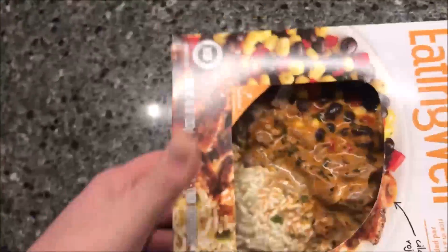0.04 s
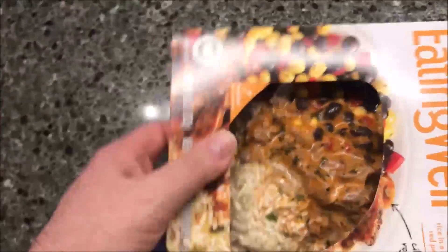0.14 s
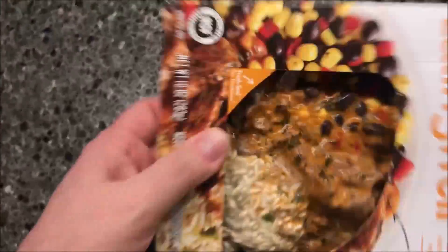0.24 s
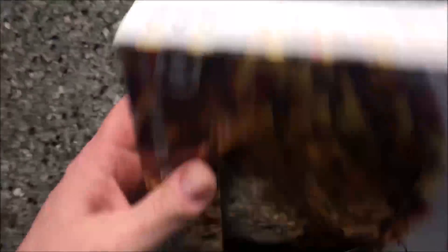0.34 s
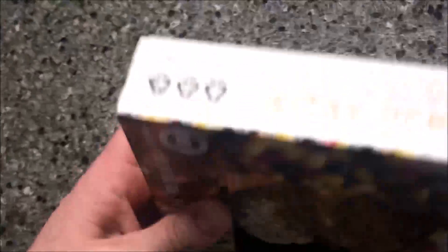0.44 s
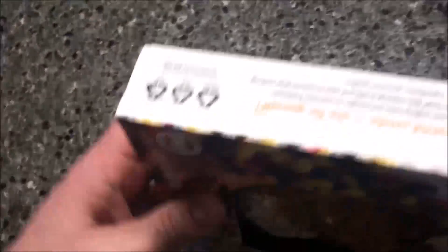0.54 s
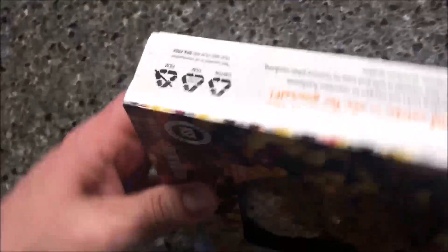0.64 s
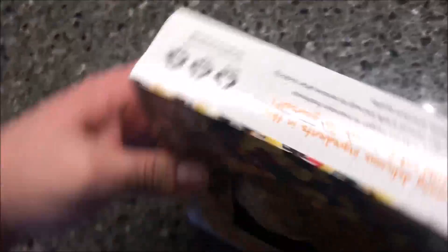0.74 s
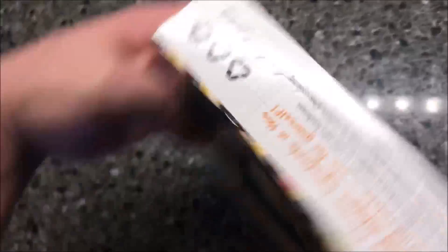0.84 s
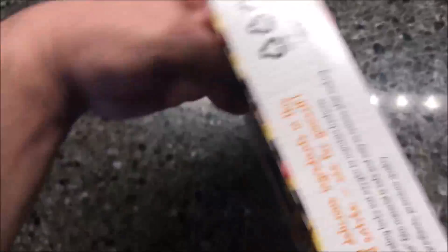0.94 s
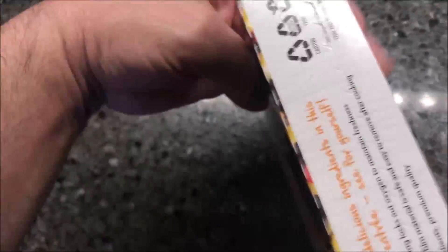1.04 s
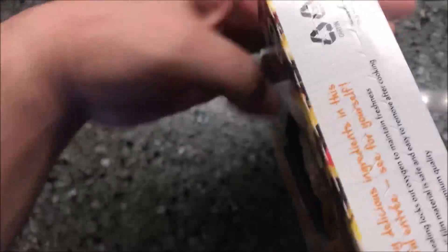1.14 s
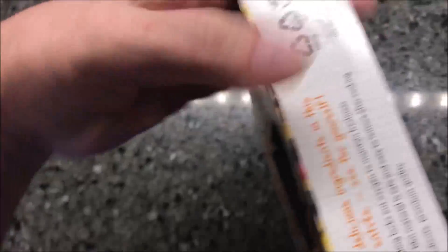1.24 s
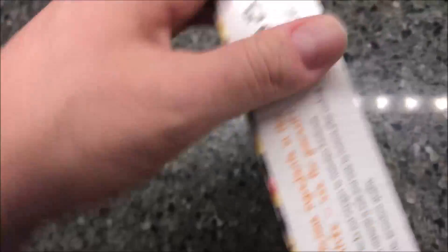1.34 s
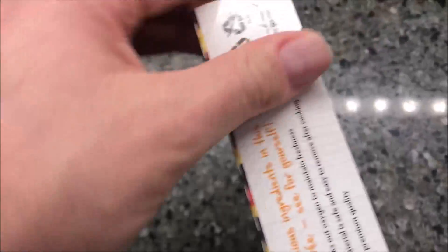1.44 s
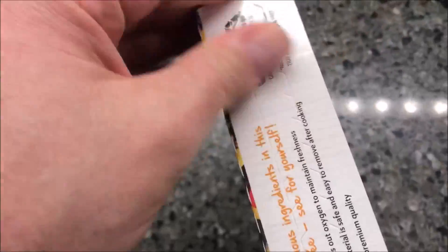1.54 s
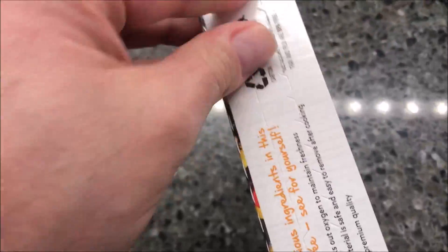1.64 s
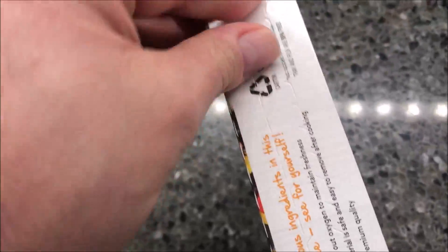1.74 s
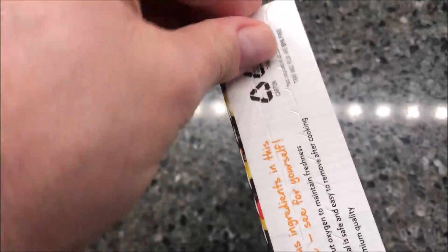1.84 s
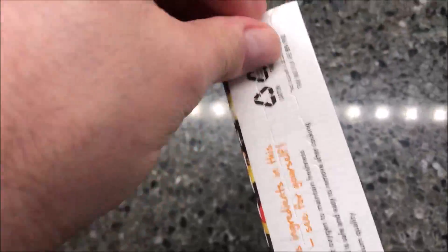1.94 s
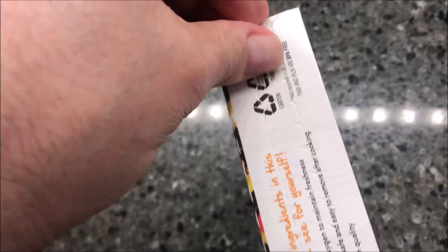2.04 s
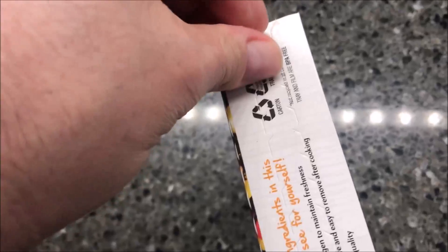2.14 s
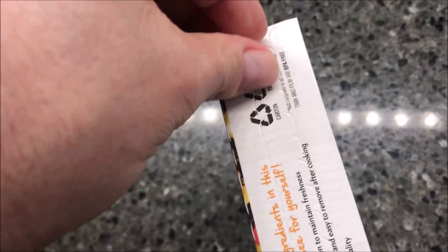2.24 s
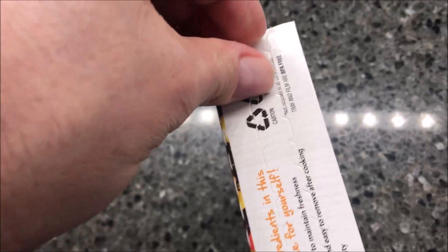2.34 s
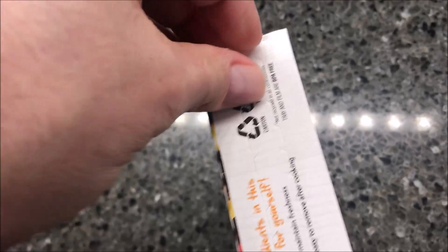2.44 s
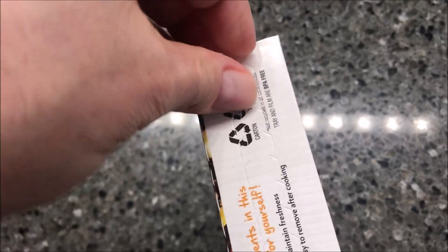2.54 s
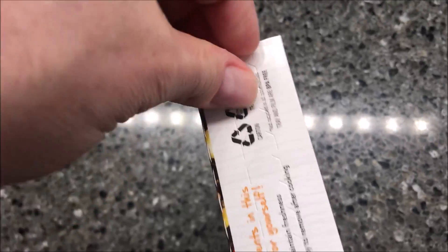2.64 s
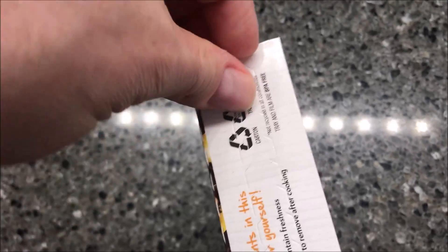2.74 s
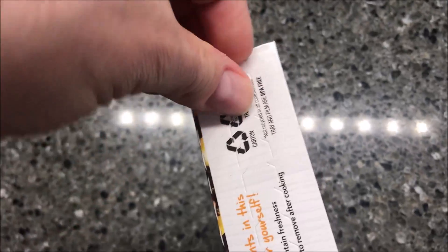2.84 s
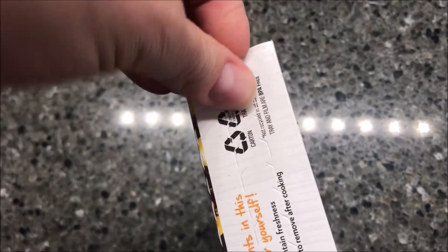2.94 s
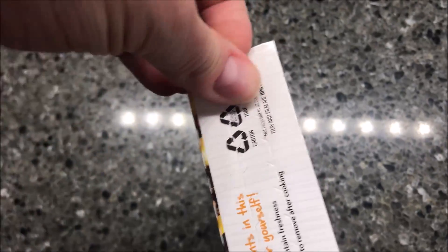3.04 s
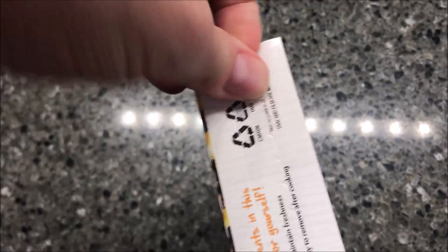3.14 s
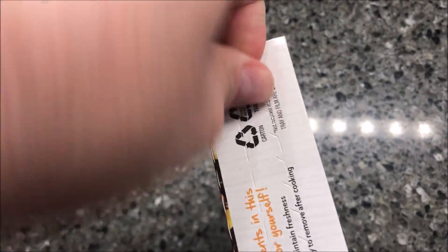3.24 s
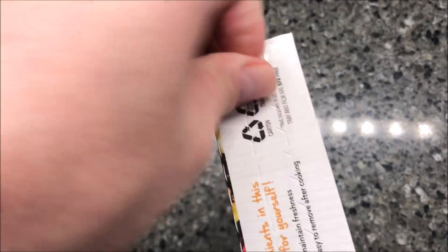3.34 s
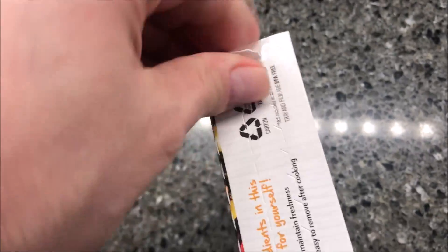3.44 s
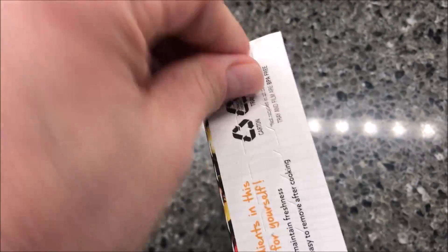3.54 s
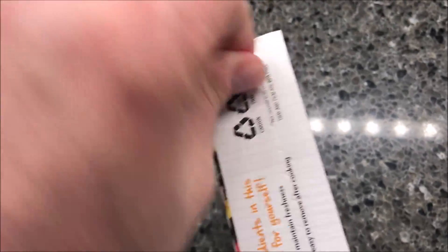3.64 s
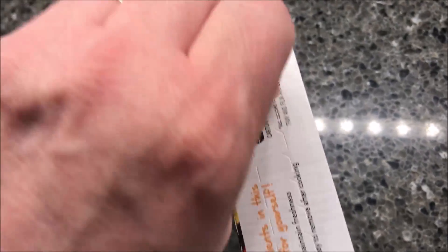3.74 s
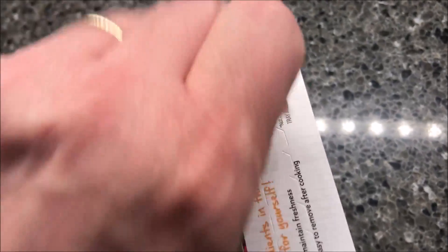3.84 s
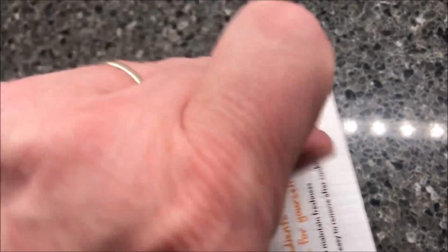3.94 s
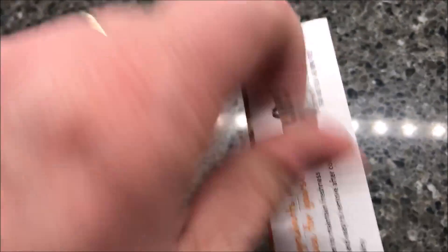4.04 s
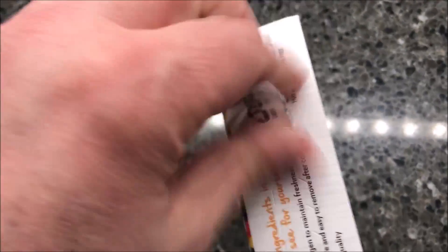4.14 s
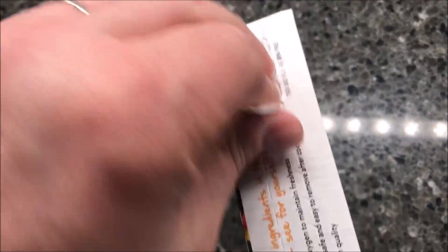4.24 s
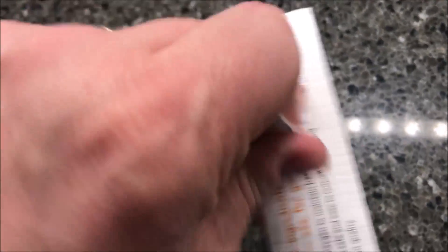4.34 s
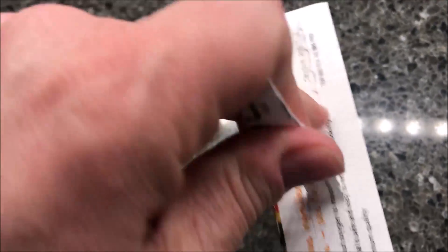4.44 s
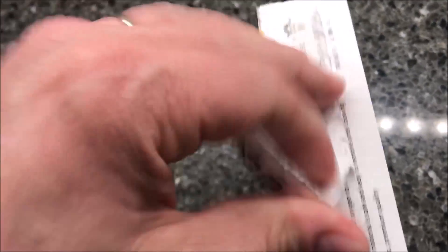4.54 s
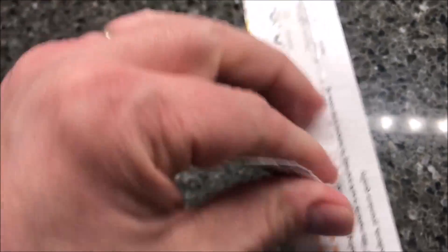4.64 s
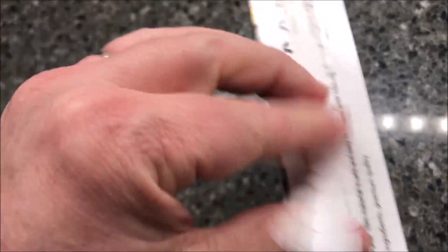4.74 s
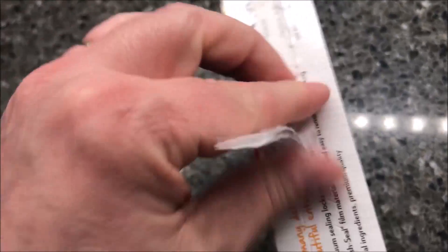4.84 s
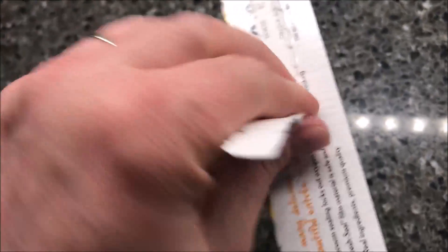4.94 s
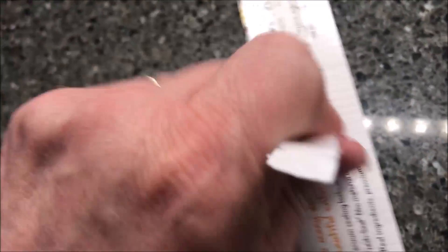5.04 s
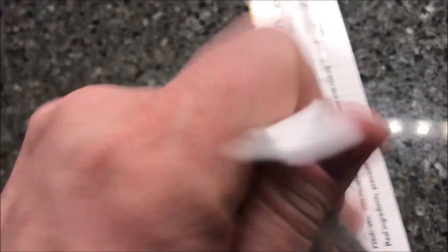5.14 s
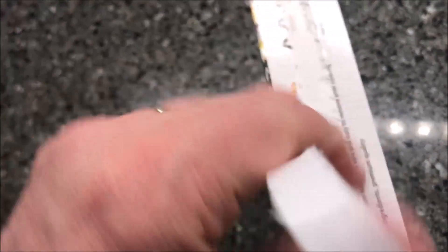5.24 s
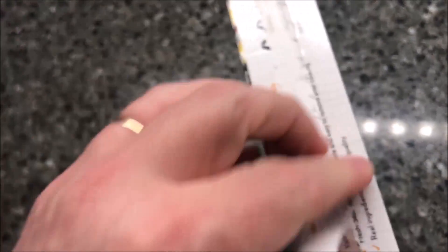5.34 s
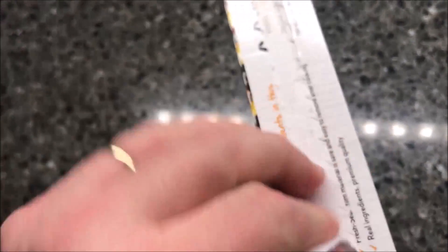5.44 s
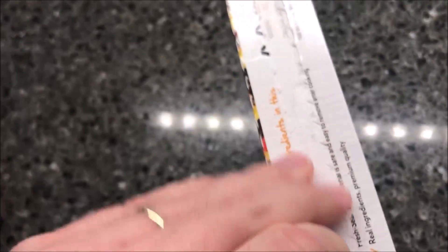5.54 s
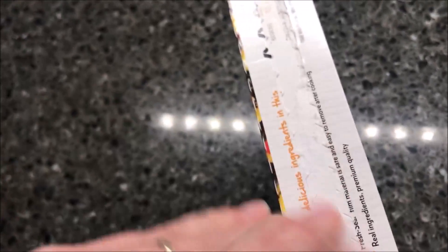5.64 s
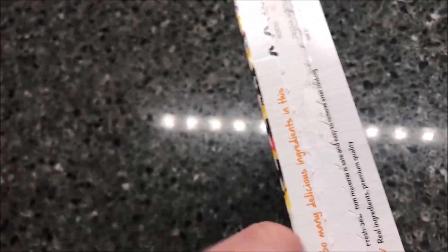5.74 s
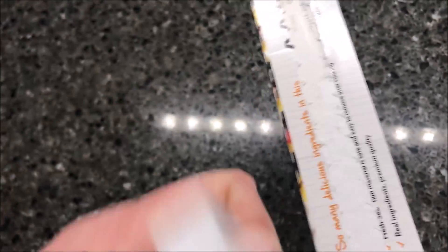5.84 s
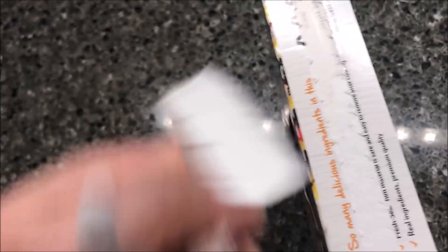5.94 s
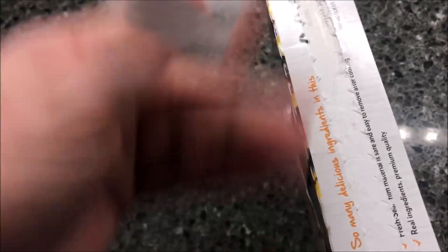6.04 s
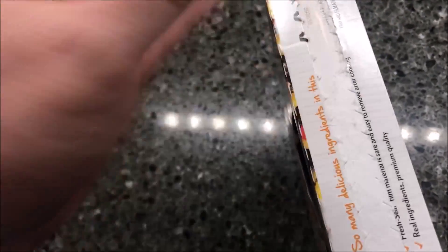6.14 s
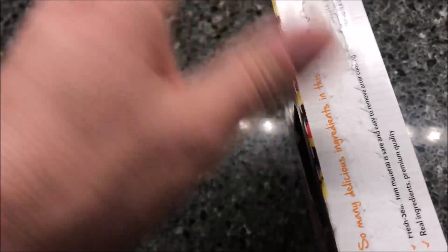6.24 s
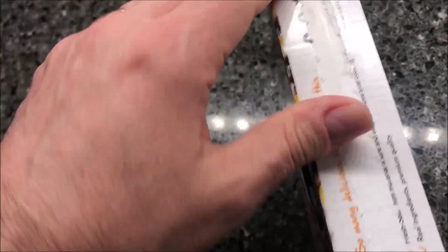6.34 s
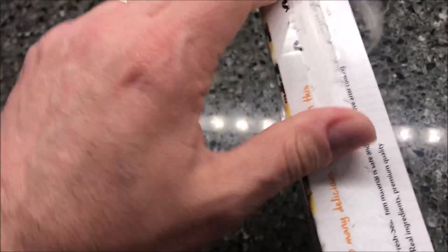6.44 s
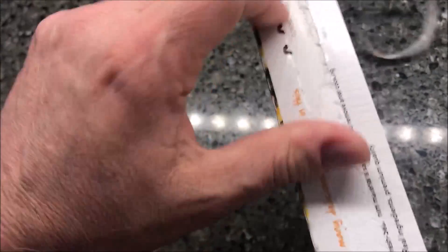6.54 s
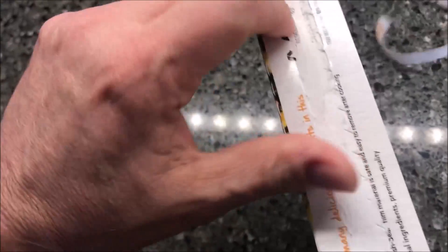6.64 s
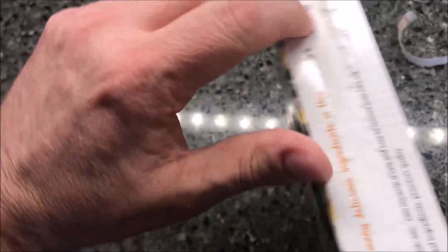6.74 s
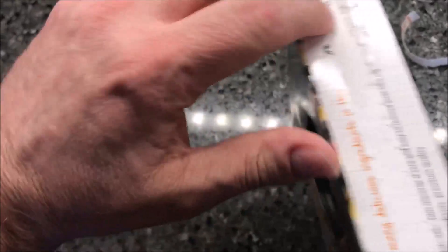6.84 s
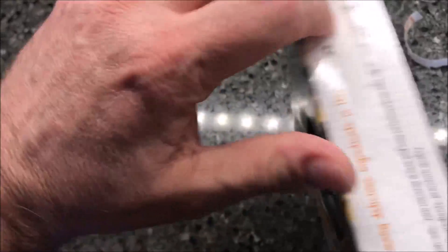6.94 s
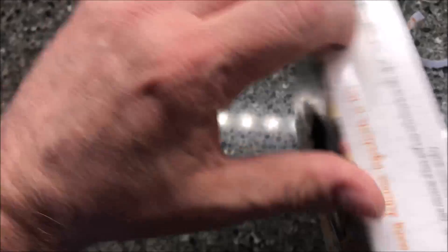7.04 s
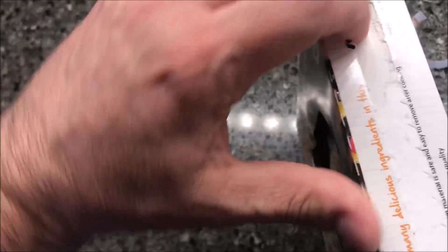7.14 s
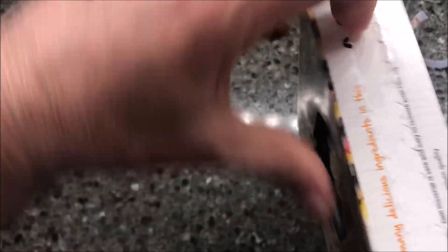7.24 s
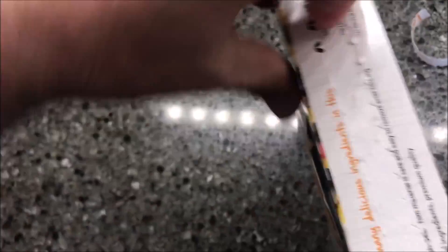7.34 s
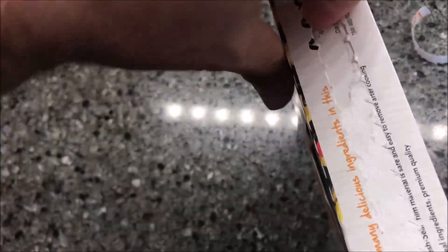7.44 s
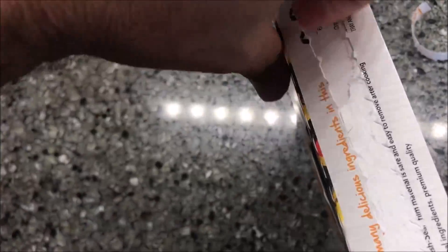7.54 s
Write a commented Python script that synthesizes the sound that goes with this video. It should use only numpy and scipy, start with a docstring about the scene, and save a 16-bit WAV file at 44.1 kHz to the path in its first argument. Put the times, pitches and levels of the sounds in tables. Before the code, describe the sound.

Hands fumble a hollow paperboard box with a low thump, clicks and dry scuffs. It rests, almost quiet, before tiny picking ticks lead to sharp popping snaps and crunchy tearing in three clusters, brighter and thinner as the box gapes. Then only small handling taps and faint brushing. Close microphone, short hard kitchen reflections, steady appliance hum.

```python
"""Tearing open a carton

A paperboard food carton is handled, set down on a stone kitchen counter, picked at and torn open along its strip.
Taps, perforation ties and tugs are bursts of random fibre snaps; sliding is a stream of tiny slips, and judders
are low stick-slip pulses. All but the judders and the low sway ring through the hollow box, whose colour changes
as it is set down and gapes open. A small hard room rings behind, over steady air and a low appliance hum.
"""
import sys
import numpy as np
from scipy import signal
from scipy.fft import rfft, irfft
from scipy.io import wavfile
from scipy.ndimage import uniform_filter1d

SR = 44100
rng = np.random.default_rng(int(sys.argv[2]) if len(sys.argv) > 2 else 0)


def master(y):
    """Save y as 16-bit WAV."""
    cut = np.clip(np.atleast_2d(y).T, -1, 1)
    pcm = np.round(cut * 32767)  # scale
    wavfile.write(sys.argv[1], SR, pcm.astype(np.int16))


N = 335098
TIME = np.arange(N) / SR
# the box is set down, and later gapes open
SET_DOWN_S, OPEN_S = 1.38, 4.8


def amp(db):
    """Decibels to gain."""
    return 10 ** (np.asarray(db) / 20)


def unit(x):
    """Scales to an energy of one."""
    return x / np.sqrt(np.sum(x ** 2) + 1e-20)


def read(points, hz):
    """Reads a table on a log-frequency axis."""
    f, value = np.transpose(points)
    return np.interp(np.log(hz + 1), np.log(f + 1), value)


def add(mix, s, sound):
    """Mixes a sound in from time s on."""
    start = round(s * SR)
    sound = sound[max(-start, 0):]
    part = mix[max(start, 0):][:len(sound)]
    part += sound[:len(part)]


def ring(x, response):
    """Passes x through an impulse response."""
    return signal.oaconvolve(x, response)[:len(x)]


def treble(db, bright_db):
    """Shares a treble level between rasp and fizz; brightness is fizz over rasp."""
    rasp = amp(db) / np.sqrt(1 + amp(bright_db) ** 2)
    return rasp, rasp * amp(bright_db)


def fibres(size, per_s, spread_db):
    """Random tiny snaps, mostly small and a few large, with a mean power of one."""
    heights = amp(spread_db * np.minimum(rng.exponential(1, size), 3.5))
    signs = rng.choice([-1, 1], size)
    happens = rng.random(size) < per_s / SR
    return unit(heights * signs * happens) * np.sqrt(size)


# tone colour of the box held up, standing shut and gaping, as the microphone hears it, with its notch
# near 10.4 kHz; relative within each range: [f/Hz, level/dB]
HELD_COLOUR = [(45, -7.5), (90, -0.5), (250, 0.5), (400, -2.5), (600, -5), (850, -5), (1200, -1.5),
               (2100, -6), (3200, -8.5), (6500, -14), (9300, -18.5), (10400, -22.5), (11500, -22),
               (16000, -23.5)]
STANDING_COLOUR = [(45, -2), (120, -1), (250, -4), (380, -1.5), (600, -7), (830, -8), (1150, 1), (1500, -4),
                   (2400, -9.5), (4000, -8.5), (9300, -12), (10400, -16), (11500, -12.5), (16000, -17)]
TORN_COLOUR = [(45, -20), (90, -18.5), (250, -14), (450, -8.5), (650, -3.5), (830, -7.5), (1100, -0.5),
               (1500, -4.5), (2300, -12), (4500, -7), (9300, -8.5), (10400, -13.5), (11500, -9.5),
               (16000, -12.5)]
# resonances of the panels and the enclosed air, lift before hollow scales it: [f/Hz, width/Hz, lift level/dB]
BOX_RESONANCES = [(381, 63, 4.5), (512, 26.6, 0), (629.4, 187, 3), (1042.9, 100, 13), (1109.5, 70, 4.5),
                  (1210.3, 118, 8.5), (1695.6, 60, 5.5), (2204, 84, 5.5), (3917, 330, 7.5), (4486, 146, 7),
                  (5310, 150, 4.5), (5850, 410, 3.5), (12700, 800, 3.5)]
# edges of the thud, panel, rasp and fizz ranges: [f/Hz]
RANGE_EDGES = [40, 450, 2500, 7500, 17000]


def carton(colour, hollow, size=8192):
    """Minimum-phase responses of the box in its four ranges; hollow scales the resonances."""
    hz = np.fft.rfftfreq(size, 1 / SR) + 1
    lift = sum((amp(hollow * db) - 1) / (1 + (2 * (hz - f) / width) ** 2) for f, width, db in BOX_RESONANCES)
    gain = amp(read(colour, hz)) * abs(1 + lift)
    responses = []
    for lo, hi in zip(RANGE_EDGES, RANGE_EDGES[1:]):
        band = gain / np.sqrt((1 + (lo / hz) ** 10) * (1 + (hz / hi) ** 10))
        log_gain = np.log(np.maximum(band / band.max(), 1e-4))
        circle = np.concatenate([log_gain, log_gain[-2:0:-1]])
        # the Hilbert transform of the log gain supplies the phase
        spectrum = np.exp(np.conj(signal.hilbert(circle)))
        responses.append(unit(np.fft.ifft(spectrum).real[:size // 4]))
    return responses


def spot(box, die_s, flex, size=1024):
    """Bending waves bounce around the board, differently from every spot; flex is their share in the lows."""
    t = np.arange(size) / SR
    paths = rng.standard_normal(size)
    low = flex * unit(paths * np.exp(-t / (2.73 * die_s)))  # long waves last longer
    high = 1.11 * unit(paths * np.exp(-t / die_s))
    bounces = low, low, high, high
    return [unit(signal.fftconvolve(h, (t == 0) + b)) for h, b in zip(box, bounces)]


def travel(drives, box, die_s, flex, size):
    """A moving source fades from one spot to the next, so its colour keeps shifting."""
    out = np.zeros(len(drives[0]))
    fade = signal.windows.cosine(size)
    hop = size // 2
    padded = np.pad(drives, ((0, 0), (hop, size)))
    for start in range(0, len(out) + hop, hop):
        pieces = padded[:, start:start + size] * fade * rng.choice([-1, 1], size)
        rung = signal.fftconvolve(pieces, np.array(spot(box, die_s, flex)), axes=1)
        add(out, (start - hop) / SR, rung.sum(0))
    return out


def blow(push, grit, box, thud_db, panel_db, crackle_db, bright_db):
    """A push moves the panels and its grit makes the treble; levels are rms over a hundredth of a second."""
    gains = amp(thud_db), amp(panel_db), *treble(crackle_db, bright_db)
    drives = push, push, grit, grit
    parts = [g * unit(ring(d, h)) for g, d, h in zip(gains, drives, box)]
    return np.sqrt(SR / 100) * sum(parts)


def sway(hz, rise_s, size=6144):
    """The whole box rocks at a rate scattered around hz, swells to a peak at rise_s and comes to rest."""
    t = np.arange(size) / SR
    rocking = np.sin(2 * np.pi * hz * rng.uniform(0.944, 1.208) * t)
    return rocking * t / rise_s * np.exp(1 - t / rise_s)


# spectrum of the room air, relative density per Hz: [f/Hz, level/dB]
AIR_SPECTRUM = [(20, -40.5), (35, -25), (55, -4), (85, -7), (150, -3.5), (220, -9), (350, -9.5), (600, -18),
                (1100, -25), (2500, -35.5), (6000, -41.5), (16000, -44.5)]
# appliance hum lines: [f/Hz, rms level/dB]
HUM_LINES = [(58, -63.5), (120, -66.5), (214, -68.5)]


def background(air_db=-55.5):
    """Steady room air as shaped noise, with a faint appliance hum of steady sines."""
    spectrum = rfft(rng.standard_normal(N)) * amp(read(AIR_SPECTRUM, np.fft.rfftfreq(N, 1 / SR)))
    air = unit(irfft(spectrum, N)) * np.sqrt(N)
    hum = sum(amp(db) * np.sqrt(2) * np.sin(2 * np.pi * (hz * TIME + rng.random())) for hz, db in HUM_LINES)
    return amp(air_db) * air + hum


# judders and squeaks under a gripping or pulling hand:
# [start t/s, end t/s, first slip f/Hz, last slip f/Hz, level/dB before the end fades]
JUDDER_EVENTS = [(0.0, 0.029, 140.9, 80.2, -29), (.045, 0.114, 110.2, 75, -43.5),
                 (.625, 0.729, 99.47, 59.8, -46.5), (1.099, 1.2, 125, 67.8, -37),
                 (1.115, 1.191, 526.4, 554.5, -40.5), (3.93, 4.05, 62, 48, -41.5),
                 (6.415, 6.481, 110.9, 85.1, -50)]


def judder(dull_hz=330, unsteady=0.0532):
    """Soft stick-slip pushes glide from a first to a last slip rate, with a slightly wandering pitch."""
    out = np.zeros(N)
    for start, end, first_hz, last_hz, db in JUDDER_EVENTS:
        hz = np.linspace(first_hz, last_hz, max(round((end - start) * SR), 20))
        wander = uniform_filter1d(rng.standard_normal(N), 200)[:len(hz)]
        turns = np.cumsum(hz * (1 + unsteady * wander / wander.std())) / SR
        # harmonics weaken above dull_hz
        pushes = sum(np.sin(2 * np.pi * k * turns) / (1 + (k * hz / dull_hz) ** 2) for k in range(1, 8))
        add(out, start, amp(db) * pushes / pushes.std() * signal.windows.tukey(len(hz), .5))
    return out


# strokes of skin or loose strip over the board, levels before the sliding trim:
# [fastest t/s, length t/s, panel level/dB, hiss level/dB, brightness level/dB]
STROKE_EVENTS = [(.01, 0.2046, -30, -40.5, -9), (0.247, 0.28, -45.5, -49, -6), (0.431, 0.344, -48, -50, -8),
                 (0.634, 0.207, -45.5, -50, -5), (0.824, 0.179, -45, -41, -2),
                 (0.961, 0.241, -43.5, -43, -2.5), (1.122, 0.156, -39.5, -41, -5.5),
                 (1.302, 0.232, -56.5, -50, 3.5), (1.46, 0.1274, -44, -38.5, 6.5),
                 (1.631, 0.1223, -44, -44.5, -0.5), (1.775, 0.229, -50.5, -55.5, -1.5),
                 (1.939, 0.398, -57.5, -64, -3.5), (3.122, 0.47, -65.5, -60.5, 3),
                 (3.331, 0.197, -44.5, -43, 0), (3.476, 0.0394, -43, -48, 5), (3.594, 0.12, -51, -55, 1),
                 (3.757, 0.0716, -45, -43, -4.5), (3.924, 0.451, -46.5, -44.5, -2.5),
                 (4.272, 0.106, -39.5, -46, 0.5), (4.393, 0.0584, -42, -35.5, -1),
                 (4.67, 0.272, -42.5, -46, 2.5), (4.842, 0.046, -47.5, -41.5, 9.5),
                 (4.948, 0.235, -51.5, -49, 1), (5.082, 0.114, -38.5, -33, 5.5),
                 (5.354, 0.1187, -37, -42.5, -1.5), (5.493, 0.172, -42.5, -46, 3.5),
                 (5.943, 0.159, -43, -47, -9.5), (6.107, 0.197, -62.5, -50.5, 6.5),
                 (6.221, 0.159, -53, -55.5, -1), (6.448, 0.0934, -48, -53.5, -6),
                 (6.52, 0.0544, -53.5, -48, 0.5), (6.627, 0.0896, -49.5, -53.5, -1.5),
                 (6.73, 0.0486, -57, -51.5, -6.5), (6.925, 0.478, -55, -54.5, -1),
                 (7.043, 0.0293, -44.5, -29, -5), (7.172, 0.069, -46, -49.5, -1.5),
                 (7.256, 0.0725, -55.5, -54, -2), (7.443, 0.1556, -49.5, -53.5, -2)]
# resting fingers still creep, before the same trim: [panel level/dB, hiss level/dB, brightness level/dB]
RESTING_GRIP = (-70, -75.5, -4.5)
# share of a stroke's length spent rising, drop at its ends, roundness of its top
STROKE_RISE, STROKE_EDGE_DB, STROKE_ROUNDNESS = 0.413, 14.5, 1.58


def rubbing(size=64):
    """Panel, rasp and fizz gains over time: every stroke swells and fades above the resting grip."""
    t = TIME[::size]
    panel_db, hiss_db, bright_db = RESTING_GRIP
    power = np.square([amp(panel_db), *treble(hiss_db, bright_db)])[:, None] * np.ones(len(t))
    for s, length_s, panel_db, hiss_db, bright_db in STROKE_EVENTS:
        away = abs(t - s) / (length_s * np.where(t < s, STROKE_RISE, 1 - STROKE_RISE))
        speed = amp(-STROKE_EDGE_DB * away ** STROKE_ROUNDNESS)
        power = power + np.outer([amp(panel_db), *treble(hiss_db, bright_db)], speed) ** 2
    return np.array([np.interp(TIME, t, gain) for gain in np.sqrt(power)])


def sliding(trim_db=-0.6725, held_thud_db=-5, standing_thud_db=-10, catch=0.664, snag=0.251):
    """Skin on coated board: a fine hiss of tiny slips with sparse coarser catches and a few ticking snags."""
    panel, rasp, fizz = rubbing()
    thud = panel * amp(np.where(TIME < SET_DOWN_S, held_thud_db, standing_thud_db))  # dB over panel
    slips = 0.7326 * fibres(N, per_s=10000, spread_db=2.5)
    slips = slips + catch * fibres(N, per_s=300, spread_db=4.0)
    slips = slips + snag * fibres(N, per_s=25, spread_db=2.5)
    drives = slips * np.array([thud, panel, rasp, fizz])
    held, standing = np.split(drives, [round(SET_DOWN_S * SR)], axis=1)
    held_box, standing_box = carton(HELD_COLOUR, hollow=0.43), carton(STANDING_COLOUR, hollow=0.315)
    out = np.zeros(N)
    add(out, 0, travel(held, held_box, die_s=0.00151, flex=1.0, size=4096))
    add(out, SET_DOWN_S, travel(standing, standing_box, die_s=0.00202, flex=1.0, size=6144))
    return amp(trim_db) * out


# kitchen decay to -60 dB by frequency: [f/Hz, t/s]
ROOM_DECAY = [(150, 0.05), (500, 0.81), (1100, 0.5258), (3000, 0.42), (7000, 0.94), (15000, 1.1)]
# kitchen reverberation strength by frequency: [f/Hz, level/dB]
ROOM_LEVEL = [(150, -20), (500, -12.5), (1100, -13), (3000, -11.5), (7000, -24.5), (15000, -25.5)]


def kitchen(x, first_s=0.0043, size=32768):
    """Dense reflections off counter, cupboards and walls, each band dying at its own speed."""
    happens = rng.random(size) < 4000 / SR  # 4000 reflections a second
    echoes = rng.standard_normal(size) * happens * (np.arange(size) / SR > first_s)
    hz, t, z = signal.stft(unit(echoes), SR, nperseg=256)
    t60 = read(ROOM_DECAY, hz)[:, None]
    # the root keeps a band's energy independent of its decay time
    gain = amp(read(ROOM_LEVEL, hz))[:, None] * np.sqrt(2 * np.log(1000) * size / SR / t60)
    decay = np.exp(-np.log(1000) * t / t60)
    return ring(x, signal.istft(z * gain * decay, SR, nperseg=256)[1])


# fingertips, nails and flaps striking the box, levels before the tap trim:
# [t/s, thud level/dB, panel level/dB, crackle level/dB]
TAP_EVENTS = [(.005, -22, -28, -34), (0.051, -42, -23.5, -35.5), (0.2244, -39.5, -34, -35.5),
              (0.2437, -33.5, -32, -47), (0.2902, -60.5, -32, -45), (.419, -60.5, -39, -46.5),
              (.53, -43.5, -55.5, -60), (.598, -54, -34, -42.5), (0.6225, -41, -35, -45),
              (0.6835, -42.5, -32.5, -45), (0.8298, -41.5, -41.5, -57), (0.9342, -38, -34.5, -45.5),
              (1.0219, -36, -35.5, -41), (1.0632, -55, -38.5, -43.5), (1.191, -46, -30.5, -36.5),
              (1.2326, -59, -41, -42.5), (1.324, -37.5, -39.5, -49), (1.6617, -65.5, -42, -57),
              (2.2004, -47, -29, -36), (2.2179, -37.5, -33.5, -46.5), (2.4539, -59.5, -51.5, -78),
              (2.5484, -60, -57, -72.5), (2.86, -66, -62.5, -65.5), (3.0484, -61.5, -63, -51.5),
              (3.115, -65.5, -73, -52), (3.138, -57.5, -73, -50), (3.1592, -63.5, -66.5, -50.5),
              (3.252, -61, -57, -49), (3.262, -63, -57, -48), (3.2943, -59.5, -44, -41.5),
              (3.334, -52.5, -38, -46), (3.473, -61, -39.5, -46), (3.486, -53.5, -39, -42),
              (3.5531, -40.5, -44.5, -48), (4.2334, -50, -38, -49), (4.2739, -43.5, -40.5, -41.5),
              (4.653, -62.5, -40.5, -41.5), (4.685, -41.5, -39.5, -40), (5.0444, -68.5, -39, -32),
              (5.3375, -53.5, -35.5, -39), (6.077, -55.5, -65, -50.5), (6.1423, -58, -62.5, -40.5),
              (6.2132, -36.5, -30, -39), (6.22, -42, -42, -43.5), (6.4139, -45, -40, -46.5),
              (6.8117, -51.5, -50, -44), (7.072, -44.5, -50, -62.5), (7.148, -54.5, -37, -47.5),
              (7.3955, -49, -41, -65), (7.5803, -50.5, -46.5, -51.5)]
# the harder a tap (crackle over panel level), the brighter and shorter: dB per dB, dB that halve the scuff
TAP_BRIGHT_PER_DB, TAP_HALVING_DB = 0.3, 9


def taps(click=0.66, ragged=1.0, trim_db=-0.56, sway_db=-7, held_scuff_s=0.0063, standing_scuff_s=0.00418,
         held_bright_db=-6, standing_bright_db=-2.5, size=4096):
    """A contact is a click and a short scuff; then the box sways. Held up, it flexes more freely."""
    out = np.zeros(N)
    held, standing = carton(HELD_COLOUR, hollow=0.446), carton(STANDING_COLOUR, hollow=0.72)
    t = np.arange(size) / SR
    contact = t == 0
    for s, thud_db, panel_db, crackle_db in TAP_EVENTS:
        in_hand = s < SET_DOWN_S
        hardness_db = crackle_db - panel_db
        soft_scuff_s = held_scuff_s if in_hand else standing_scuff_s
        scuff_s = soft_scuff_s * .5 ** (max(hardness_db, 0) / TAP_HALVING_DB)
        bright_db = (held_bright_db if in_hand else standing_bright_db) + TAP_BRIGHT_PER_DB * hardness_db
        scuff = unit(fibres(size, per_s=5000, spread_db=2.5) * np.exp(-t / scuff_s))
        box = spot(held, die_s=0.00183, flex=1.0) if in_hand else spot(standing, die_s=0.00195, flex=0.23)
        push = contact + ragged * scuff
        grit = scuff + click * contact
        add(out, s, blow(push, grit, box, thud_db, panel_db, crackle_db, bright_db))
        add(out, s, amp(thud_db + sway_db) * sway(hz=75 if in_hand else 110, rise_s=0.00854))
    return amp(trim_db) * out


# perforation ties giving way:
# [t/s, panel level/dB, crackle level/dB, brightness level/dB, spread of the break t/s]
TIE_EVENTS = [(3.7515, -26, -24.5, -9.5, 0.00168), (3.932, -24.5, -21.5, 6, 0.0034),
              (3.9677, -21.5, -21.5, -1.5, 0.00204), (4.0222, -18.5, -25.5, 2, 0.00167),
              (4.245, -33.5, -41, -5.5, 0.0036), (4.3984, -14.5, -21.5, 2, 0.00119),
              (4.44, -24, -23, 1, 0.00282), (4.4975, -20, -20.5, -2, 0.00088),
              (4.54, -30, -28, 11, 0.00275), (5.048, -39.5, -34, 9, 0.00054), (5.116, -25, -25, 0, 0.0025),
              (5.139, -26, -28, -7, 0.00337), (5.175, -22, -28, 1.5, 0.00312),
              (5.2224, -22, -31.5, 7, 0.00145), (5.259, -34, -41, 3, 0.00104),
              (5.267, -34, -38.5, -1, 0.0018), (5.63, -24, -35.5, 0, 0.0021),
              (5.716, -24.5, -36.5, 0, 0.00176), (5.749, -24.5, -27.5, -5.5, 0.00306),
              (5.878, -37, -30.5, -5.5, 0.00204), (5.899, -21.5, -23, -8, 0.00207),
              (5.904, -21.5, -24, -2, 0.0013)]
# thud over panel level at a typical spread, its gain per doubled spread, its loss per second once the box gapes
TIE_THUD_DB, TYPICAL_SPREAD_S, THUD_DB_PER_DOUBLING, LEAK_DB_PER_S = -9, 0.00215, 8, 17.5


def ties(lead_s=.012, crack=0.34, ragged=0.697, linger=1.84, jolt_db=-13, size=4096):
    """Each tie frays in a swelling burst, parts with a crack, and sheds a few last fibres. Slow breaks thud more."""
    out = np.zeros(N)
    shut, gaping = carton(STANDING_COLOUR, hollow=0.987), carton(TORN_COLOUR, hollow=0.83)
    t = np.arange(size) / SR - lead_s
    parting = abs(t) == abs(t).min()
    for s, panel_db, crackle_db, bright_db, spread_s in TIE_EVENTS:
        slowness = np.log2(spread_s / TYPICAL_SPREAD_S)
        thud_db = panel_db + TIE_THUD_DB + THUD_DB_PER_DOUBLING * slowness
        thud_db = thud_db - LEAK_DB_PER_S * max(s - OPEN_S, 0)
        swell = np.exp(np.where(t < 0, t, -t / linger) / spread_s)  # dies linger times slower than it grows
        fray = unit(fibres(size, per_s=9000, spread_db=2.0) * swell)
        box = spot(shut if s < OPEN_S else gaping, die_s=0.00171, flex=0.348)
        push = parting + ragged * fray
        grit = fray + crack * parting
        add(out, s - lead_s, blow(push, grit, box, thud_db, panel_db, crackle_db, bright_db))
        add(out, s, amp(thud_db + jolt_db) * sway(hz=62, rise_s=0.011))
    return out


# a tug bites, is strongest midway, and dies away when the hand stops
PULL_ATTACK_S, PULL_RELEASE_S, PULL_ARCH_DB = 0.00955, 0.01955, 3.5


def tug(length_s, lurch_db=1.5, lurches_per_s=60):
    """Force of one tug over time: attack, an arched hold and release; the tear advances in lurches."""
    t = np.arange(0, length_s + 2 * PULL_RELEASE_S, 1 / SR)
    arch_db = -PULL_ARCH_DB * (2 * np.minimum(t / length_s, 1) - 1) ** 2
    knots = rng.standard_normal(size=256)
    lurch = np.interp(t * lurches_per_s, np.arange(len(knots)), knots)
    attack = np.minimum(t / PULL_ATTACK_S, 1)
    release = np.exp(-np.maximum(t - length_s, 0) / PULL_RELEASE_S)
    return attack * release * amp(arch_db + lurch_db * lurch)


# tugs on the strip, levels before the tearing trim: [start t/s, length t/s, panel level/dB, crackle level/dB]
PULL_EVENTS = [(3.925, 0.107, -33, -39), (4.406, 0.0855, -30.5, -33.5), (4.494, 0.0512, -33, -31.5),
               (5.109, 0.0371, -23, -26), (5.16, 0.0642, -24, -27), (5.594, 0.069, -30.5, -31.5),
               (5.671, 0.1297, -25, -27.5), (5.816, 0.094, -32.5, -34)]


def tearing(trim_db=-0.0558, thud_db=-15, bright_db=1.14):
    """The plies peel apart in a dense stream of fibre snaps; the coarser ones shake the panels."""
    out = np.zeros(N)
    for start, length_s, panel_db, crackle_db in PULL_EVENTS:
        force = tug(length_s)
        coarse = fibres(len(force), per_s=1700, spread_db=3.0)
        fine = 0.72 * coarse + 0.768 * fibres(len(force), per_s=4500, spread_db=7.5)
        rasp_gain, fizz_gain = treble(crackle_db, bright_db)
        thud, panel = coarse * amp(panel_db + thud_db), coarse * amp(panel_db)
        drives = force * np.array([thud, panel, fine * rasp_gain, fine * fizz_gain])
        box = carton(STANDING_COLOUR if start < OPEN_S else TORN_COLOUR, hollow=0.647)
        add(out, start, travel(drives, box, die_s=0.00098, flex=0.602, size=4096))
    return amp(trim_db) * out


def scene():
    """The carton close by, the kitchen around it."""
    box = judder() + sliding() + taps() + ties() + tearing()
    return (box + kitchen(box) + background())[None]


def record(dry, cut_hz=16100):
    """The recorder's band limit, a steep low-pass."""
    low_pass = signal.firwin(511, cut_hz, window=("kaiser", 9), fs=SR)
    return signal.oaconvolve(dry, low_pass[None], "same")


dry = scene()
out = record(dry)
master(out)
```